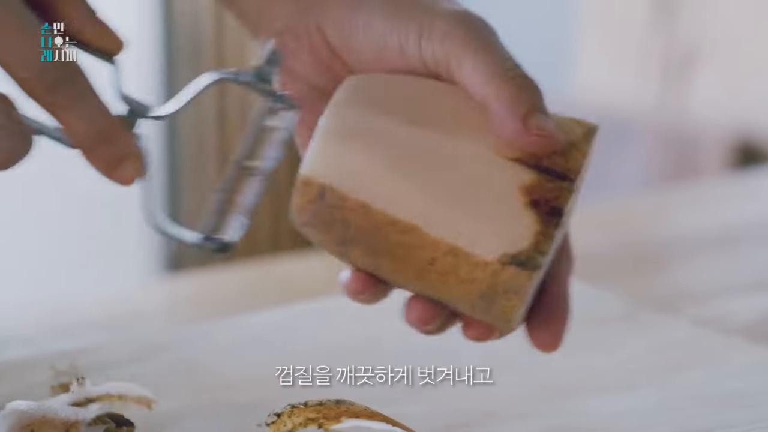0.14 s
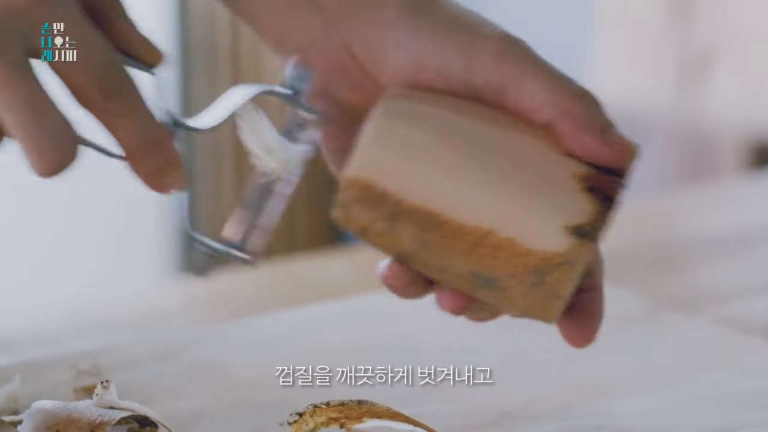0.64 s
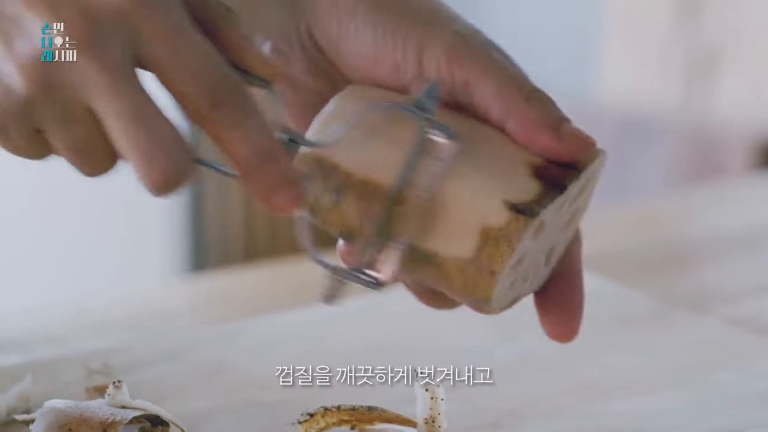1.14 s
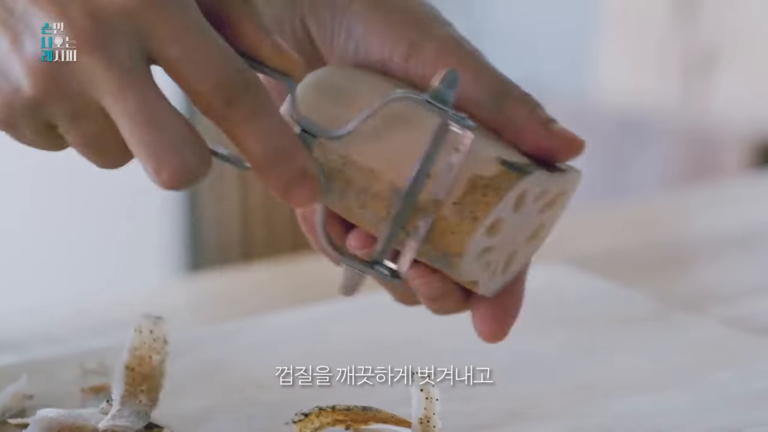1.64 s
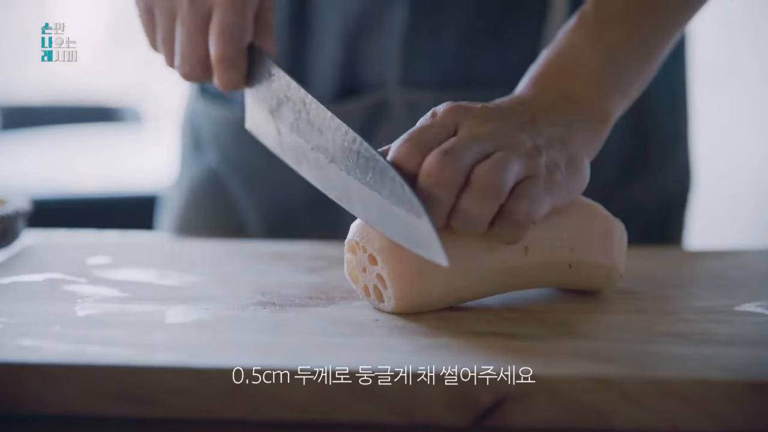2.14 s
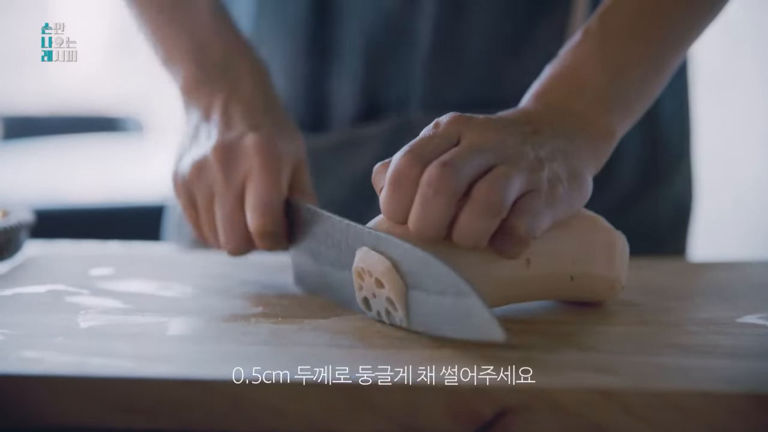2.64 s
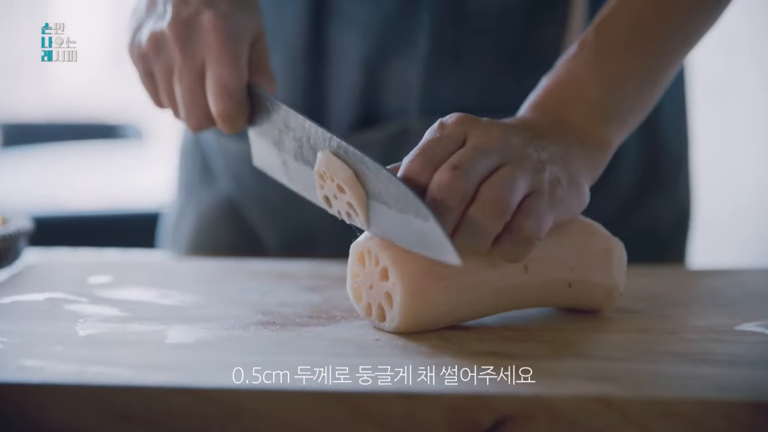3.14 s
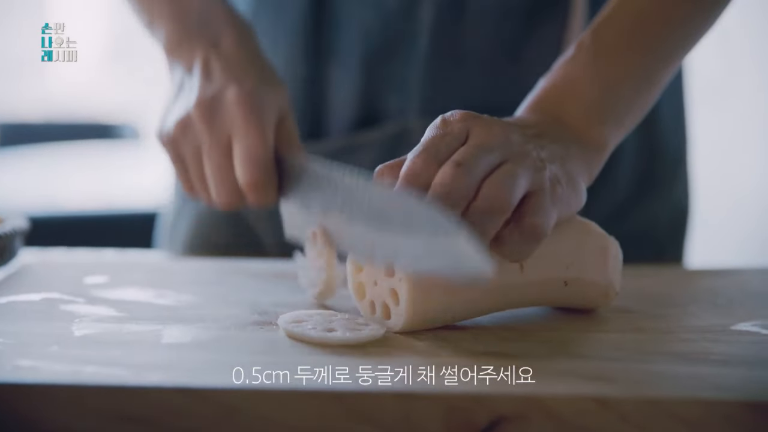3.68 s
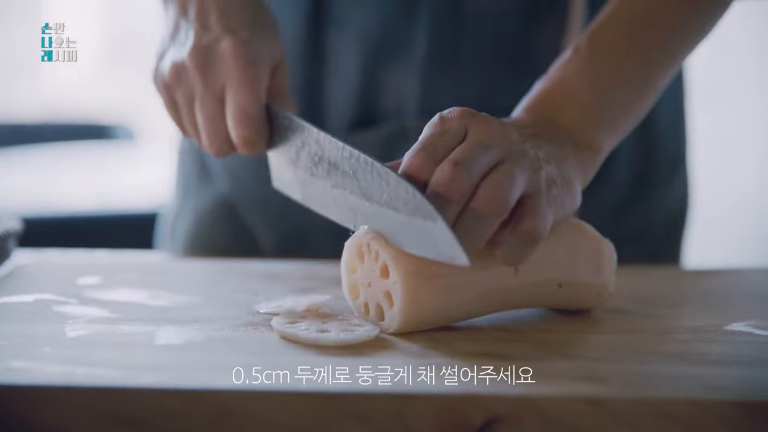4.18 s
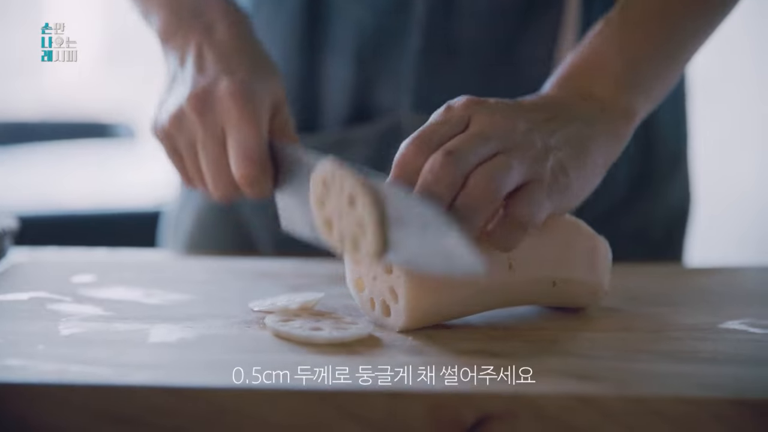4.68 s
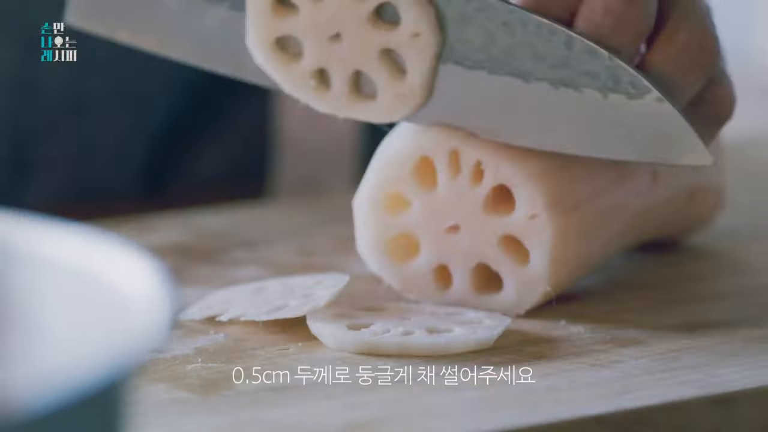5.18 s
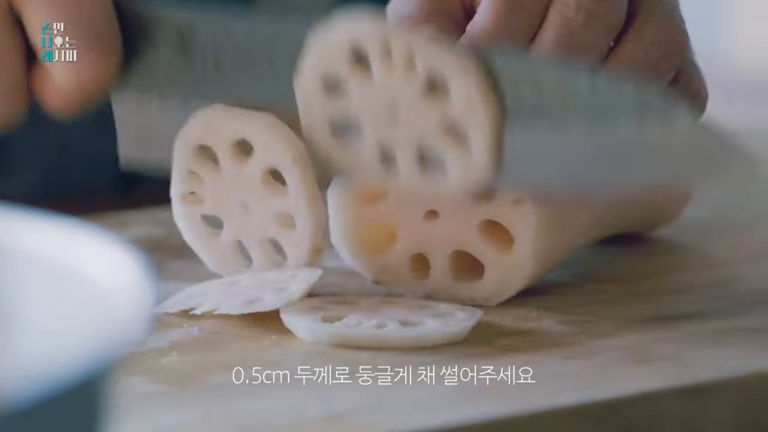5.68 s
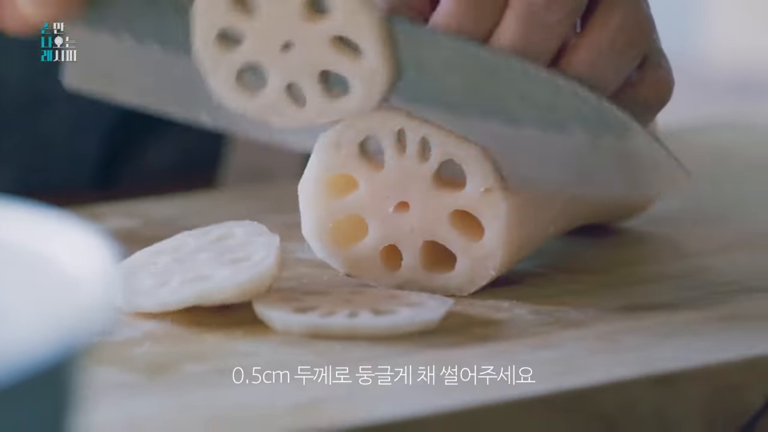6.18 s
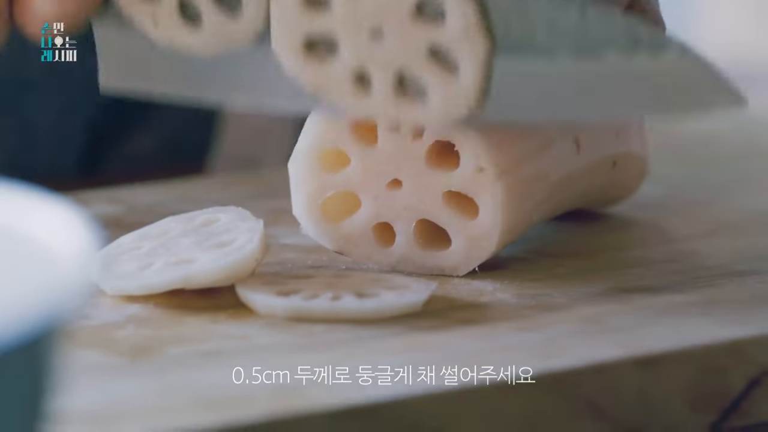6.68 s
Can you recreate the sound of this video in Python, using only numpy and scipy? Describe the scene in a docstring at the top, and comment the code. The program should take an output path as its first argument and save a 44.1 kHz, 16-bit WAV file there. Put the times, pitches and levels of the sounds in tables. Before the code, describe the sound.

Crisp hissing peeler strokes with small knocks and hinge squeaks give way to five crunchy root slices, each ending in a loud, close wooden thud.

```python
"""A peeler hisses along the skin of a crisp root, bites, knocks and squeaks in its hinge; then a heavy knife
slices the root on a wooden board. Hiss and crunch are showers of random clicks (tearing fibres) that ring the
blade and the hollow root. Each slice ends in a hard knock: a falling ring, board tones and dying noise, so loud
that it overloads the recorder. Small touches, ticks and rubbing fill the gaps in a quiet, humming kitchen."""
import sys
import numpy as np
from scipy import signal
from scipy.fft import rfft, irfft, next_fast_len
from scipy.io import wavfile

SR = 44100
rng = np.random.default_rng(int(sys.argv[2]) if len(sys.argv) > 2 else 0)


def attenuation_scalar(level_db):
    """Turn a level in dB into a linear amplitude multiplier (20 dB per decade)."""
    decades = np.asarray(level_db, float) / 20
    return 10 ** decades


def dump_mix(stems):
    """Bounce the given channels to the path in sys.argv[1] as a 16-bit WAV at rate SR."""
    frames = np.atleast_2d(stems).T  # one column per channel
    limited = np.clip(frames, -1, 1)  # hard clip at full scale
    pcm = np.round(limited * 32767).astype(np.int16)
    wavfile.write(sys.argv[1], SR, pcm)


N = 300762   # length in samples


def rms_one(x):
    """Scale a sound to an average strength (rms) of 1."""
    return x / np.sqrt(np.mean(x ** 2) + 1e-20)


def at_hz(points, hz):
    """Read a table between its points, on a log-frequency axis."""
    return np.interp(np.log(hz), np.log(np.array(points)[:, 0]), np.array(points)[:, 1])


def filtered(x, kind, hz):
    """Second-order Butterworth filter."""
    return signal.sosfilt(signal.butter(2, hz, kind, fs=SR, output="sos"), x)


def strokes(s, db, fall_db_per_s, rise_db_per_s=4000):
    """Gain through the given points, with a straight rise in dB before and a fall after."""
    t = np.arange(N) / SR
    s = np.maximum.accumulate(s)
    before_s = np.maximum(s[0] - t, 0)
    after_s = np.maximum(t - s[-1], 0)
    return attenuation_scalar(np.interp(t, s, db) - rise_db_per_s * before_s - fall_db_per_s * after_s)


def swells(s, length_s, db):
    """Gain of smooth swells centred on the given times."""
    t = np.arange(0, N, 50) / SR   # every 50th sample is enough
    shape = np.cos(np.pi * np.clip((t - np.c_[s]) / np.c_[length_s], -.5, .5))
    return np.interp(np.arange(N) / SR, t, attenuation_scalar(db) @ shape)


def shaped(x, spectrum):
    """Multiply the spectrum of a sound by a table of (f/Hz, level/dB)."""
    size = next_fast_len(len(x))
    hz = np.arange(size // 2 + 1) * SR / size + 1
    return irfft(rfft(x, size) * attenuation_scalar(at_hz(spectrum, hz)), size)[:N]


def coloured(x, spectrum):
    """Noise coloured by a spectrum; rms 1."""
    return rms_one(shaped(x, spectrum))


def resonate(x, peaks):
    """Ring resonances (f/Hz, width/Hz, level/dB) side by side, with alternating sign."""
    out = 0
    for k, (hz, width, db) in enumerate(peaks):
        r = np.exp(-np.pi * width / SR)
        a = [1, -2 * r * np.cos(2 * np.pi * hz / SR), r * r]
        ring = signal.lfilter([(1 - r * r) / 2, 0, (r * r - 1) / 2], a, x + 1e-18)
        out = out + (-1) ** k * attenuation_scalar(db) * ring
    return out


def flicker(rate, depth_db):
    """Randomly wandering gain: rate in Hz, rms depth in dB, worked out at every 16th sample."""
    r = np.exp(-32 * np.pi * rate / SR)
    noise = rng.standard_normal(N // 16 + 2002)
    slow = signal.lfilter([1], [1, -2 * r, r * r], noise)[2000:]   # skip the filter's start
    return np.interp(np.arange(N) / 16, np.arange(len(slow)), attenuation_scalar(depth_db * rms_one(slow)))


def singing(x, peaks, rate, patchy_db):
    """Resonances that come and go one by one as the contact shifts; rms 1."""
    out = 0
    for k, peak in enumerate(peaks):
        out = out + (-1) ** k * resonate(x, [peak]) * flicker(rate, patchy_db)
    return rms_one(out)


def fibres(per_s, spread_db):
    """Cells and fibres tearing: random clicks of very uneven size."""
    sizes = attenuation_scalar(spread_db * np.minimum(rng.exponential(1, N), 5)) * rng.choice([-1, 1], N)
    return rms_one(sizes * (rng.random(N) < per_s / SR))


def wet(x, spectrum, patchy_db, count=18):
    """A moist, shifting contact: over an even rasp, narrow neighbouring bands swell and fade a little."""
    centres = np.geomspace(1000, 15500, count)
    bands = singing(x, [(hz, .06 * hz, at_hz(spectrum, hz)) for hz in centres], 20, patchy_db)
    rasp = coloured(x[::-1], spectrum)   # reversed, so rasp and bands come from different fibres
    return rms_one(bands + rasp)


def burst(length_ms):
    """A contact: noise that swells for its length, then dies fast."""
    t = np.arange(SR // 10) / SR / (max(length_ms, .3) / 1000)   # in lengths
    return rng.standard_normal(len(t)) * np.minimum(t, 1) * np.exp(-3 * np.maximum(t - 1, 0))


def add(out, s, sound, peak_db):
    """Mix a sound in at a time, at a peak level."""
    i = round(s * SR)
    part = sound[:N - i]
    out[i:i + len(part)] += part * attenuation_scalar(peak_db) / np.max(np.abs(sound))


def brightening(x, gain, full_db, split_hz, lag_s, least):
    """The top of a rasp opens only as the movement gets going."""
    top = filtered(x, "high", split_hz)
    low = filtered(x, "low", split_hz)
    r = np.exp(-1 / (lag_s * SR))
    lagging = signal.lfilter([1 - r], [1, -r], gain)
    openness = least + lagging / attenuation_scalar(full_db)
    return (low - top * openness) * gain   # minus, because the two filters are opposite in phase


# room tone spectrum: (f/Hz, level/dB per Hz, relative)
AIR = [(15, -49), (25, -3.5), (70, -1), (157, -3.5), (256, 3), (463, -6.5), (1160, -7.5), (4490, -24.5),
       (16000, -40)]
# far appliance: (f/Hz, width/Hz, rms level/dB)
HUM = [(254, 3.2, -68), (468, 2.1, -72)]


def air():
    """Steady coloured noise as room tone, with two wavering hums of very narrow noise."""
    out = attenuation_scalar(-59.5) * coloured(rng.standard_normal(N), AIR)
    for hz, width, db in HUM:
        out = out + attenuation_scalar(db) * rms_one(resonate(rng.standard_normal(N), [(hz, width, 0)]))
    return out


# time in which room sound falls by 60 dB, before each use takes its share: (f/Hz, t60/s)
ROOM_T60 = [(80, .5), (210, .38), (1500, .42), (3000, .36), (6000, .22), (12000, .1)]


def dying_noise(t60_share, spectrum):
    """Half-octave bands of noise, each dying at its own pace; unit energy."""
    t = np.arange(SR // 2) / SR
    edges = 60 * 2 ** np.arange(0, 8.6, .5)
    out = 0
    for low, high in zip(edges, edges[1:]):
        hz = np.sqrt(low * high)
        band = filtered(rng.standard_normal(len(t)), "band", [low, high])
        t60 = t60_share * at_hz(ROOM_T60, hz)
        out = out + band * attenuation_scalar(at_hz(spectrum, hz) - 60 * t / t60)
    return out / np.linalg.norm(out)


def kitchen(x):
    """Reflections build up over the first 1.7 ms and die band by band."""
    build_up = np.clip(np.arange(SR // 2) / SR / 0.0017, 0, 1)
    echo = dying_noise(0.39, [(100, 3.0), (12000, -8.5)]) * build_up
    return signal.fftconvolve(x, echo)[:N]


# how much the treble differs between the two channels: (f/Hz, side over middle level/dB)
SIDE_OVER_MIDDLE = [(2500, -54), (4400, -23), (8100, -15), (15000, -2.5)]


def channel_difference(x):
    """The treble differs unsteadily between the two channels; the rest is nearly the same in both."""
    scatter = rng.standard_normal(2000) * np.exp(-np.arange(2000) / 300)
    smeared = signal.fftconvolve(x, scatter / np.linalg.norm(scatter))
    restless = rms_one(np.log(flicker(60, 0.97)))   # wanders through both signs
    return restless * shaped(smeared, SIDE_OVER_MIDDLE)


# hands shifting root, knife and slices: (middle t/s, length/s, board rumble level/dB, rustle level/dB)
HANDS = [(1.994, 0.055, -59, -58), (2.098, 0.11, -49.5, -58.5), (2.9, 0.13, -54, -86),
         (3.747, 0.14, -56, -62.5), (3.847, 0.18, -51, -82), (3.972, 0.095, -49, -59),
         (4.1, 0.18, -70, -59.5), (4.8, 0.22, -55, -70), (5.9, 0.13, -51, -89), (6.734, 0.18, -58, -69.5)]
# a wet slice slides on the blade: (f/Hz, width/Hz, level/dB)
SWISH = [(6330, 2000, 0)]


def hands():
    """Pressure shakes the board on its support; skin and root rub faintly on the blade."""
    board = [(35, 21, -14.0), (92.5, 20, -3.5), (130.0, 81.6, -5.0), (179.0, 39, -5.5)]
    rumble = rms_one(resonate(rng.standard_normal(N) * flicker(21, 3.6), board))
    rub = fibres(6000, 2.5) * flicker(45, 4.5)
    rustle = rms_one(coloured(rub, FLESH) + 0.6 * singing(rub, BLADE, 30, patchy_db=7))
    s, length_s, rumble_db, rustle_db = np.transpose(HANDS)
    fidget = attenuation_scalar(-73.5) * (np.arange(N) / SR > s[0])   # the wet root is never held quite still
    # the board rumbles under the knife
    press = attenuation_scalar(-4) * knife_force(follows=0.81, rise_db_per_s=221, fall_db_per_s=128.5)
    slide = rms_one(resonate(resonate(rng.standard_normal(N), SWISH), SWISH))
    slide = slide * swells([2.995], [0.26], [-62.5])
    shaking = rumble * (press + swells(s, length_s, rumble_db))
    rubbing = rustle * (swells(s, length_s, rustle_db) + fidget)
    return shaking + rubbing + slide


# knife, fingers and slices touching root or board: (t/s, tick peak level/dB, length/ms, thump peak level/dB)
TOUCHES = [(3.1375, -41.5, 3.7, -52.5), (3.1798, -28, 6.7, -29), (3.632, -18, 4.5, -41),
           (3.904, -46.5, 8.5, -68), (3.979, -37.5, 6.8, -63), (4.0158, -28, 6, -36),
           (4.1388, -33, 8.7, -39.5), (4.773, -48, 9.9, -54), (4.968, -40.5, 7.5, -47),
           (5.0396, -32.5, 5.56, -28), (5.228, -33.5, 14.7, -38.5), (5.891, -52.5, 3.6, -39),
           (5.9838, -36.5, 6.3, -43.5), (6.136, -32, 4.3, -36)]


def touches():
    """A short bright tick coloured by root and blade, and a push on the lowest board modes."""
    out, t = np.zeros(N), np.arange(SR // 4) / SR
    thump = np.sin(2 * np.pi * 121 * t) - .45 * np.sin(2 * np.pi * 150 * t)   # two low modes beat
    thump *= attenuation_scalar(-60 * t / .17) * (1 - np.exp(-t / .004))
    for s, db, length_ms, thump_db in TOUCHES:
        hit = burst(length_ms)
        wide = filtered(hit, "band", [1100, 6000])
        peaks = [(hz, width, p + rng.normal(0, 4)) for hz, width, p in ROOT + BLADE]
        tick = rms_one(wide) + 0.38 * rms_one(resonate(hit, peaks))
        add(out, s - length_ms / 2000, tick, db)   # t is the middle of the tick's swell
        add(out, s, thump, thump_db)
    return out


# wet slices and fingers unsticking, single fibres snapping under the edge:
# (t/s, level/dB, half a dB above the peak played)
TICKS = [(2.157, -48), (2.2293, -46), (3.377, -25), (3.4304, -20), (3.9444, -49), (4.2133, -27),
         (4.237, -29), (4.289, -26), (4.7217, -47.5), (4.825, -50), (5.1655, -48), (5.2709, -38),
         (6.1843, -32), (6.555, -47), (6.7308, -47)]


def ticks():
    """Brief bright clicks of ringing noise, each with its own colour."""
    out = np.zeros(N)
    for s, db in TICKS:
        peaks = [(hz, 600, rng.normal(0, 5.5)) for hz in (4900, 6200, 7700, 10600)]
        add(out, s - .001, resonate(burst(2.8), peaks), db - 0.5)
    return out


# peeler strokes: (blade lands t/s, grips the skin t/s, full speed t/s, runs off the end t/s, level/dB)
PEELING = [(-0.25, -0.18, -0.1, 0.036, -33), (0.425, 0.518, 0.555, 0.716, -34),
           (1.045, 1.110, 1.2, 1.346, -34), (1.612, 1.673, 1.75, 1.892, -35)]


def peeling_speed():
    """Each stroke lands, rests, grips, runs at full speed, sags and drops off the end."""
    out = 0
    for land, grip, full, off, db in PEELING:
        steps = db + np.array([-17, -25, -7, 0, -3, -19.5])   # dB against the stroke's level
        times = [land, grip, grip + .013, full, off, off + .012]
        out = out + strokes(times, steps, fall_db_per_s=282)
    return out


def peeler_swing():
    """The peeler brushes back over the skin for a second, centred 0.51 s before each landing."""
    middles = [row[0] - 0.51 for row in PEELING]
    return swells(middles, [1], np.full(len(PEELING), -65)) * flicker(22, 3.6)


# how much the root's air channels answer each stroke: (level/dB)
HOLLOW_DB = [3, -13, -14, -9.5]
# blade landing or knocking: (t/s, peak level/dB, length/ms, brightness level/dB, metal over thud level/dB)
BITES = [(0.039, -20.5, 3.5, -3, 9), (0.059, -30.5, 19, 11, 6), (0.101, -38, 9.6, -2, 4),
         (0.119, -35, 12, 0, 4), (0.4197, -14.5, 9.4, -8, -3.5), (0.496, -34, 27, -21, -10.5),
         (1.041, -16.5, 5.8, -7.5, 0), (1.057, -35, 3.7, -9, -10), (1.344, -31, 4.4, -10, 13),
         (1.4759, -30.5, 1.1, 0.5, 5), (1.6095, -21, 4.5, -15, 6.5), (1.916, -34, 3.4, 6, 0)]
# blade squeaking in its hinge: (t/s, peak level/dB)
HINGE = [(0.059, -28), (0.099, -34), (0.715, -26), (0.748, -35), (0.805, -37.5), (0.8936, -40),
         (1.328, -27), (1.38, -37), (1.547, -43.5), (1.607, -21.5), (1.881, -28)]
# resonances of the held peeler blade: (f/Hz, width/Hz, level/dB)
PEELER = [(1700, 200, -1), (2390, 120, -9), (3950, 260, 2), (4910, 81, -10), (5820, 230, 0),
          (6560, 140, -7), (7960, 280, -1), (10300, 350, -10)]
# loose blade in its hinge: (f/Hz, width/Hz, level/dB before a random change)
SQUEAK = [(12850, 65, 2), (12500, 600, -8), (8600, 200, -8), (6250, 45, -2), (4050, 100, -3)]
# spectrum of tearing skin: (f/Hz, level/dB per Hz, relative)
SKIN = [(900, -87), (1660, -12), (3300, -1.5), (3960, -18), (5160, -4.5), (5820, -10), (10500, -10.5),
        (16000, -15)]


def peeler():
    """Skin tearing drives the thin blade; knocks and hinge squeaks ring it."""
    tear = fibres(7000, 3.0) * flicker(120, 1.6)
    skin = wet(np.roll(tear, SR), SKIN, 6)   # shifted a second, so other fibres sound here
    hiss = rms_one(singing(tear, PEELER, 14, patchy_db=4.5) + .5 * skin)
    hiss = filtered(hiss, "high", 1200)   # a thin blade sends out little bass
    hollow_db = np.interp(np.arange(N) / SR, [row[0] for row in PEELING], HOLLOW_DB)
    hiss = hiss + attenuation_scalar(hollow_db) * rms_one(resonate(tear[::-1], [(1883, 270, 0)]))
    out = brightening(hiss, peeling_speed(), full_db=-32, split_hz=11000, lag_s=0.064, least=0.12)
    out += (skin + .3 * hiss) * peeler_swing()
    for s, db, length_ms, bright_db, metal_db in BITES:
        hit = burst(length_ms)
        # a free blade rings longer: narrower resonances; those below 3 kHz make the thud
        peaks = [(hz, .8 * width, p + rng.normal(0, 2) - metal_db * (hz < 3000)) for hz, width, p in PEELER]
        # the handle frame rings on, beating
        peaks += [(5010, 30, metal_db - 3), (5065, 30, metal_db - 6)]
        top = filtered(hit, "band", [6000, 15000])
        knock = rms_one(resonate(hit, peaks)) + attenuation_scalar(bright_db) * rms_one(top)
        add(out, s - length_ms / 2000, knock, db)   # t is the middle of the swell
    for s, db in HINGE:
        peaks = [(hz, width, p + rng.normal(0, 2)) for hz, width, p in SQUEAK]
        add(out, s, resonate(burst(4.15), peaks), db)
    return out


# knife going through the root, up to its knock on the board:
# (edge set t/s, bites t/s, set level/dB, bite level/dB, last level/dB)
SLICING = [(2.282, 2.369, -55.5, -40, -32.5), (3.274, 3.346, -51.5, -32.5, -27.5),
           (4.132, 4.175, -50.5, -40.5, -28), (5.218, 5.291, -54, -35, -26), (6.13, 6.171, -50, -36, -28.5)]


def knife_force(follows=1, rise_db_per_s=4000, fall_db_per_s=699):
    """The edge creeps on the skin, bites, pushes harder down to the board and stops."""
    out = 0
    for (set_s, bite, set_db, bite_db, last_db), chop in zip(SLICING, CHOPS):
        # levels may be followed only in part
        steps = follows * (np.array([set_db, set_db, bite_db, last_db]) - last_db) + last_db
        out = out + strokes([set_s, bite, bite + 0.045, chop[0]], steps, fall_db_per_s, rise_db_per_s)
    return out


# resonances of the knife blade: (f/Hz, width/Hz, level/dB)
BLADE = [(4010, 350, -4), (5120, 110, -3.5), (6090, 13, -3), (6850, 57, -5.5), (7370, 52, -3.5),
         (8530, 64, -3.5)]
# spectrum of crisp flesh: (f/Hz, level/dB per Hz, relative)
FLESH = [(1290, -36), (2200, -14), (3040, -8), (3900, -6), (8440, -8.5), (13700, -12), (16000, -27.5)]
# resonances of the hollow root: (f/Hz, width/Hz, level/dB)
ROOT = [(810, 170, -1), (2024, 140, 5), (2775, 190, -3.5)]
# an air channel sounds higher as the root gets shorter, slice by slice: (f/Hz)
CHANNEL_HZ = [1080, 1190, 1230, 1230, 1290]


def slicing():
    """Crisp flesh splits in clumps along the blade, tough fibres snap singly, and the hollow root sounds."""
    split = fibres(12000, 3.0) * flicker(120, 1.5)
    snaps = resonate(fibres(250, 5.0), [(4200, 2500, 0), (7500, 3000, -2)])
    flesh = wet(np.roll(split, SR), FLESH, 5.5)
    blade = singing(split, BLADE, 14, patchy_db=4)
    crunch = rms_one(.85 * blade + flesh + .28 * rms_one(snaps))
    force = knife_force() * flicker(40, 2.0)   # the edge sticks and slips
    # the next slice's pitch takes over 0.3 s after each knock
    which = np.searchsorted([chop[0] + .3 for chop in CHOPS[:-1]], np.arange(N) / SR)
    channel = np.choose(which, [resonate(split, [(hz, 80, 9)]) for hz in CHANNEL_HZ])
    hollow = singing(split, ROOT, 34.0, patchy_db=4.5) + 3.8 * channel * flicker(30, 1.9)
    bright = brightening(crunch, force, full_db=-28, split_hz=12000, lag_s=0.06, least=0.13)
    return bright + 0.33 * hollow * force ** 0.88


# knife meeting the board: (t/s, gain/dB, edge starting f/Hz, edge level/dB, relative blade clack level/dB)
CHOPS = [(2.5353, 1, 673, -3.5, -6), (3.4770, 3, 2015, 1.5, -5.5), (4.3844, 5.5, 1854, 4.5, -19),
         (5.4520, 4, 1967, 1, -12), (6.356, 4, 1968, 3, -23.5)]
# board modes that stand out: (f/Hz, level/dB before changes from blow to blow, t60/s)
BOARD = [(129.4, -14, 0.089), (311.4, -22, 0.27), (546.4, -24.5, 0.24), (592, -35.5, 0.54),
         (728, -32.5, 0.39), (791, -25.5, 0.097), (943, -27, 0.17), (1280, -25, 0.14)]
# many close board and table modes: (f/Hz, level/dB per Hz, relative)
THUD = [(60, -11.5), (120, -1), (320, 1), (800, 0), (2100, -10.5), (3300, -19.5), (6000, -22.5),
        (12000, -29)]


def chops():
    """The edge cracks on the wood with a falling ring; the board thuds and a few of its modes stand out."""
    out, t = np.zeros(N), np.arange(SR // 2) / SR
    for s, db, edge_hz, edge_db, clack_db in CHOPS:
        # the contact widens as the edge sinks in
        falling_hz = 650 + (edge_hz - 650) * np.exp(-(t / 0.0044) ** 2)
        # the edge ring loses 60 dB in 20 cycles of its starting pitch
        edge_gain = attenuation_scalar(edge_db - 60 * t * edge_hz / 20.0)
        blow = edge_gain * -np.sin(2 * np.pi * np.cumsum(falling_hz) / SR)
        clack = resonate(rng.standard_normal(len(t)), [(2650, 130, 0.005), (3200, 250, 0.003)])
        blow += attenuation_scalar(clack_db + 12.5 - 60 * t / 0.017) * clack
        for hz, mode_db, t60 in BOARD:
            swell = 1 - np.exp(-t * hz / 1.9)   # low modes build up later
            beat_hz = rng.uniform(8, 24)   # close pairs beat
            swell *= 1 + 0.54 * np.cos(2 * np.pi * (beat_hz * t + rng.random()))
            # a dull blow wakes the higher modes less
            dull_db = 4.9 * np.log2(edge_hz / 2000) * (hz > edge_hz)
            gain = attenuation_scalar(mode_db + rng.normal(0, 1.1) + dull_db - 60 * t / t60)
            blow += gain * swell * np.sin(2 * np.pi * (hz * t + rng.random()))
        thud = dying_noise(0.097, THUD) + 0.43 * dying_noise(1.235, THUD)   # short and long part
        blow += attenuation_scalar(12.5) * thud * np.clip(t / 0.00085, 0, 1)
        # last fibres snap
        add(out, s - .004, resonate(burst(2.4), [(1810, 2600, 1.0), (4500, 710, -1.5)]), db - 17)
        i = round(s * SR)
        out[i:i + len(t)] += attenuation_scalar(db) * blow[:N - i]
    return out


def scene():
    """Work close to the microphone, plus its reflections, the knocks, the hands and the room tone."""
    work = peeler() + slicing() + touches() + ticks()
    mid = work + attenuation_scalar(-17) * kitchen(work) + chops() + hands() + air()
    return mid + channel_difference(mid) * np.array([[1], [-1]])   # left and right


def roll_off(x):
    """The treble ends steeply here."""
    return signal.sosfilt(signal.butter(12, 16500, fs=SR, output="sos"), x)


def record(dry):
    """The knocks overload the recorder and flatten smoothly at 0.76; the highest treble is cut."""
    flat = dry / (1 + np.abs(dry / .76) ** 6) ** (1 / 6)
    treble_cut = signal.cheby2(16, 50, 16350, fs=SR, output="sos")   # order, dB down, Hz
    mix = signal.sosfilt(treble_cut, flat)
    return roll_off(mix)


dry = scene()
out = record(dry)
dump_mix(out)
```